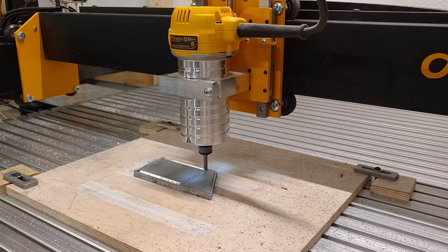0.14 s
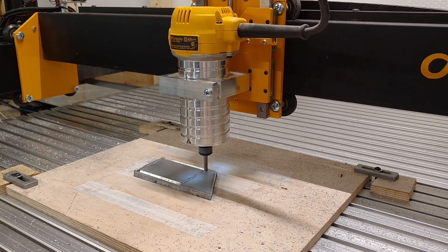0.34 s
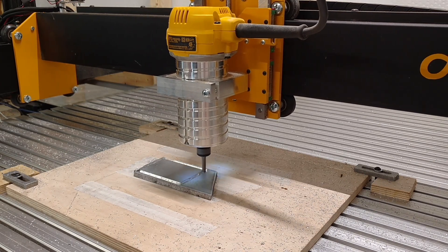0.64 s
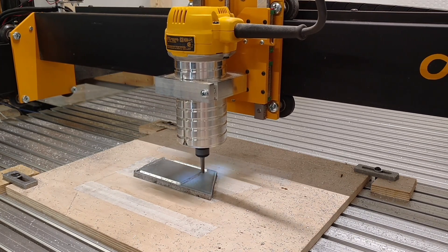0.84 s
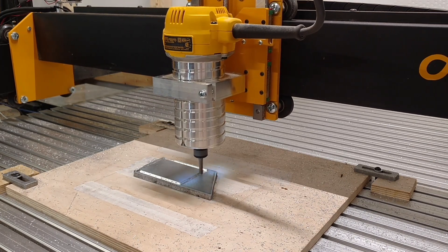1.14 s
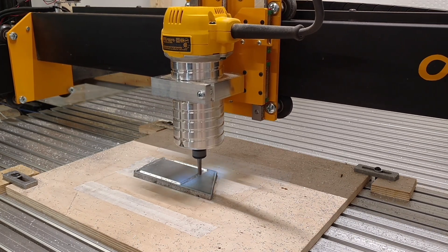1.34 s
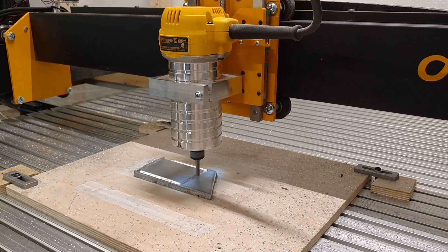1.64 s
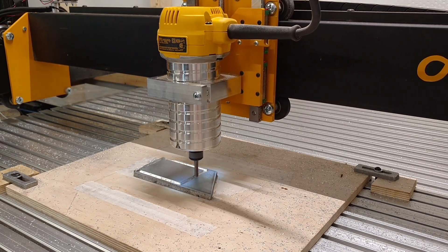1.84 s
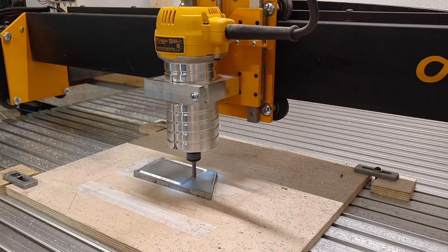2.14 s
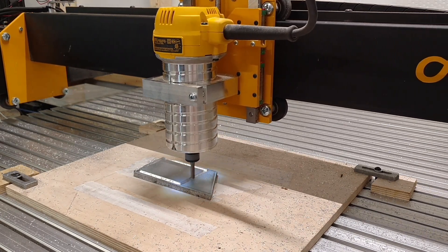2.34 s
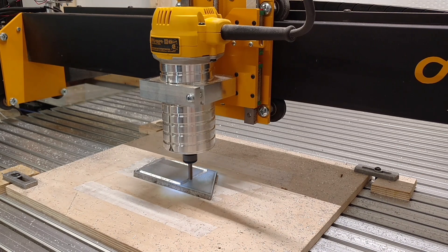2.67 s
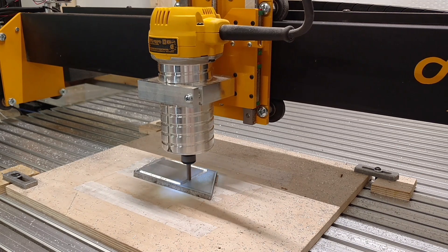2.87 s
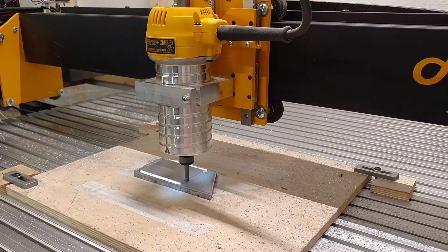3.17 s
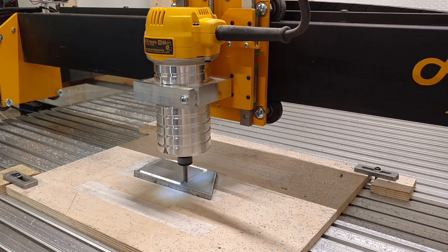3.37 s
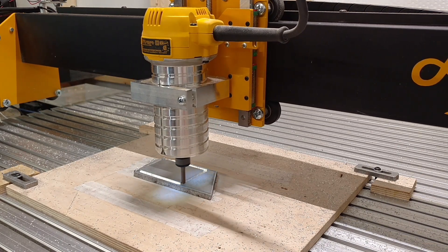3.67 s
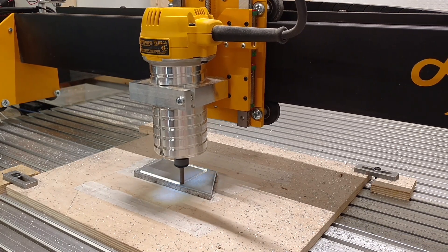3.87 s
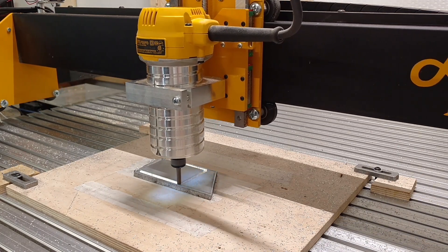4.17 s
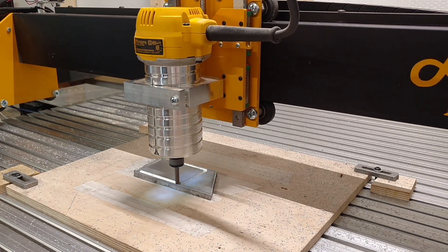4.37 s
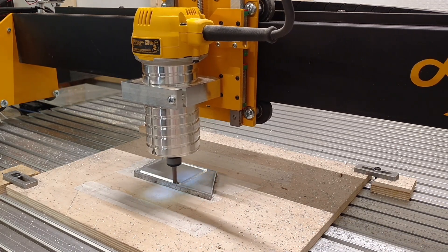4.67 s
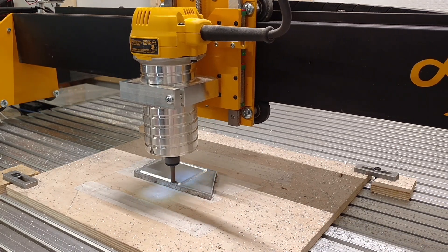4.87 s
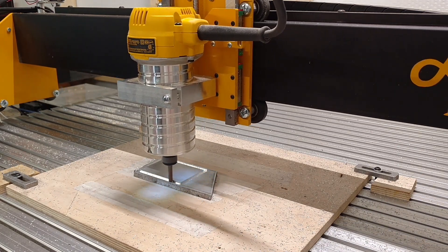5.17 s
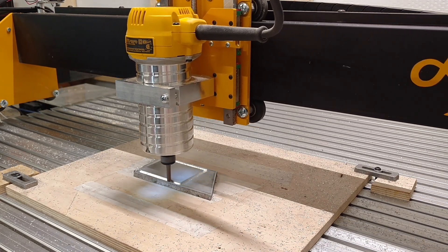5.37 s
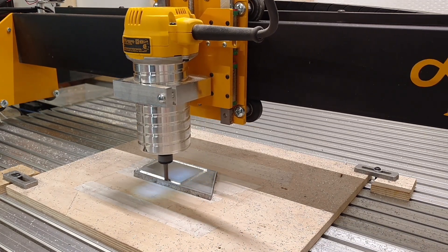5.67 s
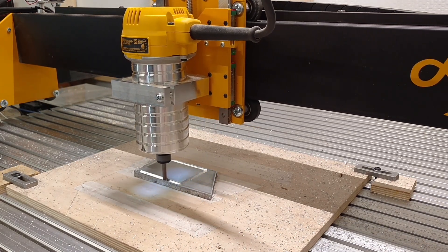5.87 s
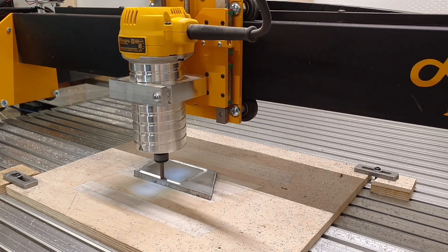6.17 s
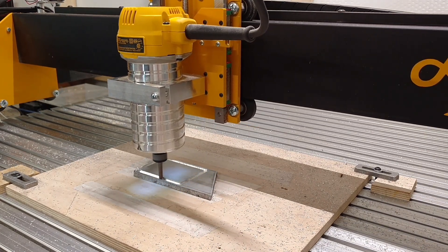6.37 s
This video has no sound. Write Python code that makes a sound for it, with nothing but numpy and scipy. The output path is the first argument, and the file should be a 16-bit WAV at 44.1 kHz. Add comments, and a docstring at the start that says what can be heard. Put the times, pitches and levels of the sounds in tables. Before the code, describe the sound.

Close-up metal milling in a workshop: droning cutter, buzzing uneven chatter and hissing chips, a brief shriek, then smoother ringing over motor whine and fan rush.

```python
"""Router milling aluminium

A trim router on a gantry machine mills an aluminium plate with a two-flute bit, heard close by in a workshop.
The flutes drone at twice the shaft rate; the plate chatters against the cut, then locks to it and sings.
The motor whines in mains-rate throbs over the rush of its cooling fan. Tones are trembling waves tied to
the shaft angle; scraping, chips and fan are shaped noise."""
import sys
import numpy as np
from scipy import signal
from scipy.fft import rfft, irfft
from scipy.io import wavfile
from scipy.ndimage import uniform_filter1d

SR = 44100
rng = np.random.default_rng(int(sys.argv[2]) if len(sys.argv) > 2 else 0)


def unload_audio(sound):
    """Save the sound as a 16-bit wav file, at the path given as the first command line argument."""
    columns = np.transpose(np.atleast_2d(sound))
    # keep every value between -1 and 1, then stretch to whole-number steps
    steps = np.round(np.clip(columns, -1, 1) * 32767)
    wavfile.write(sys.argv[1], SR, steps.astype(np.int16))


N = 287532
T = np.arange(N) / SR  # time in seconds
THROB_HZ = 120  # two throbs per mains cycle
SHRIEK_S = 3.96  # the edge shrieks as the plate locks

# grabs of the bit, strong and weak, while the loose plate chatters: t/s, strength/dB (scaled for each sound)
GRABS = [(0.012, 6.5), (0.089, 0), (0.355, 3.5), (0.398, 2), (0.438, 4.5), (0.48, 3.5), (0.562, 4.5),
         (0.612, -3.5), (0.702, -0.5), (0.756, 0.5), (0.793, 3), (0.833, 2), (0.88, 1.5), (0.92, -0.5),
         (0.961, 2), (0.991, 4), (1.025, -1.5), (1.069, 1.5), (1.108, 2), (1.139, 1.5), (1.17, 6),
         (1.214, 3), (1.258, -1.5), (1.318, 5), (1.363, 5.5), (1.405, 2.5), (1.457, 4), (1.485, 1.5),
         (1.547, 4.5), (1.591, 4.5), (1.665, 1.5), (1.771, 0), (1.819, 4.5), (1.856, 0), (1.905, 1),
         (1.948, 1), (2.01, 7), (2.125, 4.5), (2.166, 5), (2.201, 4.5), (2.31, 3), (2.427, 7), (2.51, 1),
         (2.605, 1.5), (2.638, 1.5), (2.725, 5.5), (2.767, 3.5), (2.992, 3.5), (3.03, -0.5), (3.076, 3.5),
         (3.138, 1), (3.225, -2.5), (3.284, 4), (3.313, 3.5), (3.371, 6.5), (3.41, 1.5), (3.452, 1.5),
         (3.524, 5.5), (3.58, -2), (3.676, 3), (3.732, 0), (3.778, 1), (3.861, -1.5)]


def undb(db):
    """Turn decibels into gain."""
    return 10 ** (np.asarray(db) / 20)


def curves(table):
    """Join each column of a table by straight lines in time."""
    s, *columns = np.transpose(table)
    return [np.interp(T, s, column) for column in columns]


def bump(s, length):
    """A smooth swell of height 1 around time s."""
    return np.exp(-((T - s) / length) ** 2)


def swells(table):
    """Add up swells, each with a time, a half length and a height."""
    return sum(height * bump(s, length) for s, length, height in table)


def settle(loose, locked, lock):
    """A level that passes from its loose to its locked value."""
    return loose + (locked - loose) * lock


def wander(hz):
    """A smooth random curve of spread 1 that changes up to about hz times a second."""
    points, span_s = 2 ** 15, 8
    f = np.arange(points // 2 + 1) / span_s
    slow = irfft(rfft(rng.standard_normal(points)) / (1 + (f / hz) ** 4) ** .5)
    y = np.interp(T, np.arange(points) * span_s / points, slow)
    return y / y.std()


def tremble(rough, rough_hz):
    """A factor of typical size 1 that shakes the level and phase of a tone."""
    shake = wander(rough_hz) + 1j * wander(rough_hz)
    return (1 + rough * shake) / np.sqrt(1 + 2 * rough ** 2)


def tone(phase, rough, rough_hz):
    """A rotating tone of typical size 1 whose level and phase tremble."""
    start = rng.uniform(0, 2 * np.pi)
    return np.exp(1j * (phase + start)) * tremble(rough, rough_hz)


def place(z, pan_db, lead):
    """A rotating tone at two microphone ports, left against right in level (dB) and phase lead (radians)."""
    sides = np.array([[.5], [-.5]])
    return np.sqrt(2) * np.real(z * undb(sides * pan_db) * np.exp(1j * sides * lead))


def rush(spectrum, pan_db, drive):
    """Shaped stereo noise, rms 1 before panning; going up the treble, the ports hear it alike or opposed."""
    # how opposed the two ports are: f/Hz, side minus mid/dB
    opposition = [(40, 11), (120, 0), (300, -7.5), (800, -4), (1200, -27), (1600, -13), (2000, -11.5),
                  (2250, 3.5), (2480, 6.5), (2800, 11), (3300, -9), (3850, -22), (4250, 5), (4750, 7.5),
                  (5200, 31), (5700, 2), (6550, -14), (7100, 1.5), (7800, 9), (8500, -1.5), (9300, -2.5),
                  (10500, 5.5), (11700, -6.5), (13000, 6), (14300, -4)]
    f = np.arange(N // 2 + 1) * SR / N

    def gain_over_pitch(table):
        hz, db = np.transpose(table)
        return undb(np.interp(np.log(f + 1), np.log(hz), db))

    gain, apart = gain_over_pitch(spectrum), gain_over_pitch(opposition)

    def noise(share):
        return irfft(rfft(drive * rng.standard_normal(N)) * gain * share / np.hypot(1, apart), N)

    mid, side = noise(1), noise(apart)
    y = np.array([mid + side, mid - side])
    return y / y.std() * undb(np.array([[.5], [-.5]]) * pan_db)


def entry():
    """Level in dB of the bit's entry: it rings weakly at first and comes up as it enters the plate."""
    entry_db, entry_s = -7, 1
    return entry_db * np.exp(-T / entry_s)


def motor(angle, lock):
    """Twelve armature slots whine, kicked by each mains half cycle; the shaft hums and adds weak overtones."""
    # basic level of the whine, which also wavers: t/s, level/dB
    whine_levels = [(0.0, -17.5), (0.09, -25), (0.27, -20), (0.62, -23.5), (0.82, -21), (1.32, -21.5),
                    (1.4, -23), (2.78, -23.5), (3.43, -23), (6.52, -25)]
    # basic level of the shaft's imbalance hum: t/s, level/dB
    hum_levels = [(0.05, -43.5), (1.27, -40.5), (1.32, -43.5), (3.95, -50.5), (4.11, -42.5), (6.5, -40)]
    # whine lines around order 12: multiple of the mains throb, relative level/dB
    sidebands = [(-2, -23.5), (-1, -11.5), (0, -3.5), (1, 1), (2, -9), (3, -10), (4, -21)]
    # the flutes' overtone swells while the bit cuts smoothly: t/s, half length/s, gain/dB
    overtone_swells = [(0.244, 0.093, 9), (4.04, 0.11, 6.5)]
    # weaker tones: multiple of shaft rate, level/dB, change when locked/dB, left minus right/dB, left lead/rad
    shaft_tones = [(3, -40, -1, 7.5, 0.4), (6, -34, -3.5, -7.5, -0.94), (8, -32.5, 0.5, -6.5, -1.5),
                   (9, -43.5, -4, -4.5, -2), (10, -41.5, -2, -6, 4), (11, -44, 10.5, 3, 2),
                   (13, -27, 0, -0.5, 3.5), (21, -64, 8, -13, -1.5), (24, -42, -7, 5, -1.5),
                   (25, -45.5, -11, 5, -3.5), (26, -53, 2, 4, -8.5), (27, -54, -14, 6, 3),
                   (30, -51, -13, 2, 5), (48, -63, 0, -2, 2.2)]
    (whine_db,), (hum_db,) = curves(whine_levels), curves(hum_levels)

    throb = sum(undb(db) * np.exp(2j * np.pi * round(k) * THROB_HZ * T) * tremble(rough=0.035, rough_hz=6.7)
                for k, db in sidebands)
    whine = throb * tone(12 * angle, rough=.03, rough_hz=20)
    out = place(whine * undb(whine_db - 0.9 + 0.9 * wander(4.5)), pan_db=5.5, lead=1.37)

    # the hum wavers, and its wavering turns over as the plate locks
    hum_db = hum_db + 1.0 + 2 * (0.5 - lock) * wander(2.3)
    out += place(tone(angle, rough=0.13, rough_hz=23) * undb(hum_db), pan_db=-2.5, lead=0.89)

    overtone_db = settle(-33, -34, lock) + swells(overtone_swells) + 1.8 * wander(3.1)
    out += place(tone(4 * angle, rough=0.22, rough_hz=29) * undb(overtone_db), pan_db=1.0, lead=.1)
    for k, db, locked_db, pan_db, lead in shaft_tones:
        weak = undb(db + locked_db * lock) * tone(round(k) * angle, rough=0.4, rough_hz=9.3)
        out += place(weak, pan_db, lead)
    return out


def beats():
    """Turns by which free chatter falls behind the forced tone; the two pull together at every grab."""
    beat_hz = 22.9  # between grabs the rate shifts, often widely, to fit whole beats
    s = np.sort([s for s, db in GRABS])
    turns = np.cumsum(np.round(np.diff(s, prepend=s[0]) * beat_hz))
    # ahead of the first grab and after the last, the beats run evenly
    return np.interp(T, s, turns) + beat_hz * (T - np.clip(T, s[0], s[-1]))


def cutting(angle, lock, load, force_db, grab_db):
    """Flute blows drive frame, plate and bit; the plate's chatter runs just below the forced tone and beats."""
    # the plate loses its grip for a moment: t/s, half length/s, depth (0-1)
    slips = [(0.23, 0.1, 0.28), (1.712, 0.02, 0.75), (2.33, 0.33, 0.3), (2.876, 0.099, 0.47),
             (4.569, 0.0079, 0.5), (4.662, 0.0061, 0.8), (4.771, 0.0034, 0.6), (5.303, 0.0057, 0.4),
             (5.43, .007, 0.2), (5.557, 0.0059, 1), (5.692, 0.0091, 0.66), (5.76, 0.0061, 0.9),
             (5.832, 0.011, 1), (5.905, 0.0071, 0.85), (6.144, 0.0036, 0.9)]
    # the gantry frame, shaken by the flute blows: f/Hz, relative level per Hz/dB
    frame = [(60, -56), (200, -20), (290, -2.5), (340, -13), (390, -1), (430, -15.5), (490, -0.5),
             (560, -12), (610, -2), (700, -7), (1000, -18), (2000, -78)]
    # the bit's ring swells or sinks as the cut shifts: t/s, half length/s, gain/dB
    ring_swells = [(3.965, 0.028, 4.5), (4.065, .045, -3), (5.09, 0.05, 4), (5.638, 0.028, 5),
                   (6.367, 0.047, -7)]
    slip = swells(slips)
    loose = 1 - lock

    # the loose plate hits at the top of each beat and lets go between; load changes bring bursts
    lag = beats() + (0.013 + 0.16 * lock) * wander(5.5)
    bead_db = .5 * (np.cos(2 * np.pi * lag) - 1)
    burst = undb(0.82 * grab_db + loose * (0.5 * load + bead_db))
    chatter = np.exp(-2j * np.pi * lag) * tremble(rough=.15, rough_hz=24) * undb(settle(-28.5, -33.5, lock))

    # until the plate locks, the pulsing motor torque leaves a faint ripple on the drone
    ripple = 1 + .052 * loose * np.exp(2j * np.pi * THROB_HZ * T)
    drone = undb(force_db + 0.45) * tone(2 * angle, rough=0.12, rough_hz=20.0) * ripple
    groan = rush(frame, pan_db=0.5, drive=undb(2.2 * load)) * undb(force_db - 18.5 - 1.0 * lock)

    # once locked, the plate's forced tone keeps growing, by 1.35 dB a second
    forced_db = settle(-25.5, -21.0, lock) + 1.35 * np.maximum(T - SHRIEK_S, 0)
    sing = (1 - slip) * (undb(forced_db) + chatter) * tone(5 * angle, rough=0.048, rough_hz=40)

    # each flute passes the chatter on to the bit, two orders higher; the bit feels most of a slip
    passed_on = undb(-5.5 - 4 * lock) * chatter
    ring = (undb(settle(-26.5, -23, lock)) + passed_on) * tone(7 * angle, rough=0.05, rough_hz=34.7)
    ring = (1 - 0.88 * slip) * ring * undb(entry() + swells(ring_swells))

    ringing = place(sing, pan_db=-1.4, lead=0.19) + place(ring, pan_db=-1.5, lead=-1.08)
    return groan + place(drone, pan_db=-3.5, lead=0.35) + burst * ringing


def scraping(angle, lock, load, grab_db):
    """Metal tears once per flute, harder under load, rattles the plate and squeals on the cutting edge."""
    # flutes scraping metal: f/Hz, relative level per Hz/dB
    rasp_spectrum = [(200, -59), (690, -30), (780, -2.5), (900, -1.5), (1100, -3.5), (1420, 1.5),
                     (1650, -3), (1880, 5), (2080, 0.5), (2250, -3.5), (2450, -7), (3600, -5), (8000, -53)]
    # rattle of the plate, loose or locked: f/Hz, relative level per Hz/dB
    plate_spectrum = [(200, -68), (700, -18.5), (860, -18.5), (1100, -20), (1160, -6.5), (1240, -1),
                      (1280, 3), (1345, -5), (1400, -15), (1700, -20.5), (2600, -62)]
    # squeal of the cutting edge: multiple of the shaft rate, relative level/dB
    squeal_tones = [(14, -2), (15, -9), (16, -6.5), (17, -15)]
    bite = (1 + 0.27 * np.cos(2 * angle)) * undb(1.2 * load)
    rasp = rush(rasp_spectrum, pan_db=-2.0, drive=bite) * undb(settle(-27, -30, lock))

    shaking = undb(.9 * load + 2.0 * wander(140))
    rattle = rush(plate_spectrum, pan_db=0.0, drive=shaking) * undb(settle(-29.5, -28.5, lock))

    edge = sum(undb(db) * tone(round(k) * angle, rough=.9, rough_hz=24) for k, db in squeal_tones)
    # the squeal builds by 1.4 dB a second up to the shriek
    build_db = 1.4 * np.minimum(T - SHRIEK_S, 0)
    squeal_db = settle(-32.5, -37.5, lock) + build_db + 10.5 * bump(SHRIEK_S, length=0.073)
    squeal = place(edge * undb(squeal_db), pan_db=-4.0, lead=.2)

    contact_db = 0.59 * grab_db + 0.37 * entry()
    return (rasp + rattle + squeal) * undb(contact_db)


def resonances(lock, load, grab_db):
    """The scraping keeps narrow resonances of frame and plate ringing, made as strongly shaken tones."""
    # resonances that shift in level as the plate locks: f/Hz, half width/Hz, loose level/dB, locked level/dB
    modes = [(160, 7.2, -62, -67.5), (387.7, 6, -51.5, -52), (473, 26, -45, -45), (832, 27, -50, -40.5),
             (898, 7, -45, -50.5), (994, 17, -42.5, -39.5), (1188, 15, -35.5, -36), (1423, 16, -48, -40),
             (1498, 19, -48.5, -52.5), (1957, 26, -49.5, -59), (2067, 11, -44.5, -43)]
    z = sum(undb(settle(loose_db, locked_db, lock)) * tone(2 * np.pi * hz * T, rough=10, rough_hz=width)
            for hz, width, loose_db, locked_db in modes)
    return place(z * undb(1.0 * load + 0.15 * grab_db), pan_db=-2.5, lead=0.22)


def flicker(y):
    """Narrow bands of a hiss swell and fade on their own, each for a few hundredths of a second."""
    patchy_db = 2.0  # spread of the band levels
    bands = signal.stft(y, nperseg=512)[2]
    swell = rng.standard_normal(bands.shape[1:])
    swell = uniform_filter1d(swell, size=4, axis=0)  # smooth over pitch
    swell = uniform_filter1d(swell, size=5, axis=1)  # smooth over time
    out = signal.istft(bands * undb(patchy_db * swell / swell.std()))[1][:, :N]
    return out * y.std() / out.std()


def air(angle, lock, force_db, grab_db):
    """The fan rushes on almost evenly; flying chips hiss in small surges with force and grabs."""
    # cooling fan: f/Hz, relative level per Hz/dB
    fan_spectrum = [(15, -75), (30, -51), (55, -34), (110, -16.5), (160, -18), (195, -19), (260, -4),
                    (340, -12), (700, -8.5), (900, -3.5), (2250, -3), (2470, -5.5), (2730, 4.5), (3200, -2),
                    (5000, -39)]
    # spray of fine chips: f/Hz, relative level per Hz/dB
    chip_spectrum = [(2400, -31), (3650, -5), (3850, -5), (4300, -1.5), (4700, -0.5), (4950, 4),
                     (5250, -5.5), (5600, -6.5), (6350, -2), (6700, -5.5), (7050, -5), (7500, -8.5),
                     (8800, -11), (9300, -9), (10200, -12), (10600, -18), (11500, -17), (12300, -23.5),
                     (14400, -24), (15000, -38)]
    # a thicker spray of chips flies off: t/s, half length/s, gain/dB
    sprays = [(0.04, 0.01, 1.5), (0.297, 0.017, 2.5), (0.353, 0.023, 3), (0.76, 0.019, 3),
              (1.064, 0.011, 3), (2.006, .01, 4.5), (3.498, 0.0078, 6), (3.938, .014, 5), (4.338, 0.019, 2)]
    fan = rush(fan_spectrum, pan_db=-2.0, drive=1 + 0.042 * np.cos(angle)) * undb(-28.5)

    # chips leave in a puff at each turn and at each flute, in uneven grains
    puffs = 1 + .055 * np.cos(angle) + .085 * np.cos(2 * angle)
    grains = undb(.5 * wander(40) + .8 * wander(900))
    hiss = flicker(rush(chip_spectrum, pan_db=.5, drive=puffs * grains))

    surge_db = 0.14 * (force_db - force_db.mean()) + 0.28 * grab_db + 0.67 * wander(7)
    spray_db = settle(-27, -26, lock) + surge_db + swells(sprays)
    return fan + hiss * undb(spray_db)


def pings():
    """Chips strike the plate and set it ringing in short, rough tones over the hiss."""
    # rings of the plate: t/s, level/dB
    ping_times = [(2.44, -34), (3.5, -31), (3.712, -34), (3.93, -31), (4.207, -33), (5.084, -48),
                  (5.604, -33), (6.15, -32)]
    ping_hz, half_length_s = 4560, 0.019
    size = sum(undb(db) * bump(s, half_length_s) for s, db in ping_times)
    return place(size * tone(2 * np.pi * ping_hz * T, rough=0.26, rough_hz=45), pan_db=-5, lead=1.83)


def scene():
    """One shaft angle drives it all; the load flickers, and the bit grabs in rapid, uneven succession until lock."""
    # shaft speed, held by the governor: t/s, turns per second f/Hz
    speed = [(0.0, 263.26), (0.2, 261.39), (0.6, 262.26), (1.5, 262.82), (1.6, 262.32), (2.31, 263.16),
             (2.51, 261.42), (3.21, 262.76), (3.31, 261.92), (3.51, 261.93), (3.71, 263.0), (4.11, 261.75),
             (4.61, 262.53), (4.81, 262.1), (5.32, 262.48), (5.52, 262.01), (5.92, 262.68), (6.52, 261.52)]
    # the plate falls into step with the shaft: t/s, locked (0-1)
    lock_steps = [(3.89, 0), (3.94, 1)]
    # force on the flutes, as the basic level of their drone: t/s, level/dB
    force_levels = [(0.0, -18.5), (0.2, -24), (0.33, -17), (0.71, -21), (0.83, -18.5), (2.09, -22),
                    (2.52, -18.5), (2.54, -21), (3.9, -21), (4.28, -24.5), (5.72, -26.5), (6.52, -26)]
    (shaft_hz,), (lock,), (force_db,) = curves(speed), curves(lock_steps), curves(force_levels)
    # motor, cut, scraping and air all follow this angle
    angle = 2 * np.pi * np.cumsum(shaft_hz) / SR
    load = wander(16)
    grab_db = sum(db * bump(s, length=0.019) for s, db in GRABS)

    out = motor(angle, lock)
    out += cutting(angle, lock, load, force_db, grab_db)
    out += scraping(angle, lock, load, grab_db)
    out += resonances(lock, load, grab_db)
    out += air(angle, lock, force_db, grab_db)
    return out + pings()


def record(dry):
    """The microphone side rounds the highest peaks and cuts the top treble; the sound starts and ends softly."""
    top_hz, fade_s = 15100, .003
    rounded = dry / (1 + (dry / .9) ** 8) ** (1 / 8)
    fade = np.minimum(np.minimum(T, T[::-1]) / fade_s, 1)
    low_pass = signal.ellip(10, .2, 80, top_hz, fs=SR, output="sos")
    return signal.sosfilt(low_pass, rounded * fade)


dry = scene()
out = record(dry)
unload_audio(out)
```